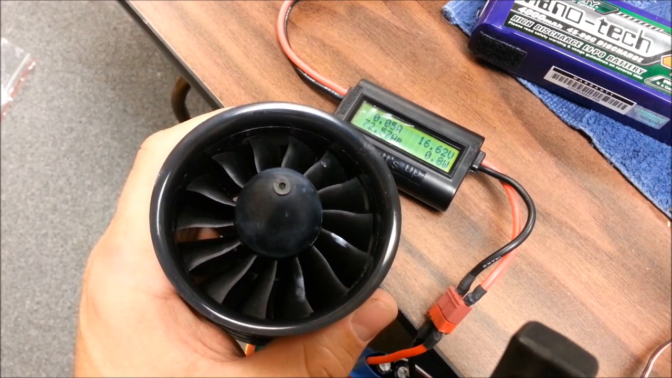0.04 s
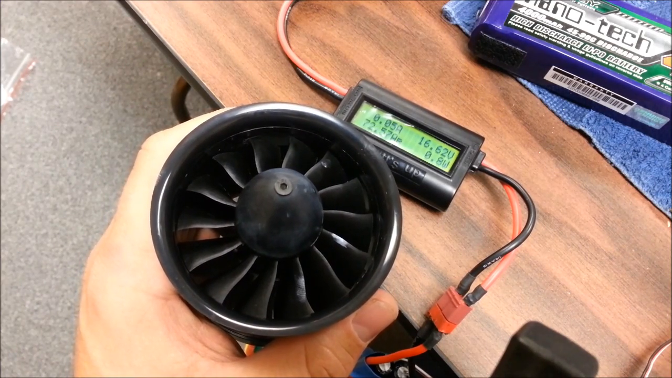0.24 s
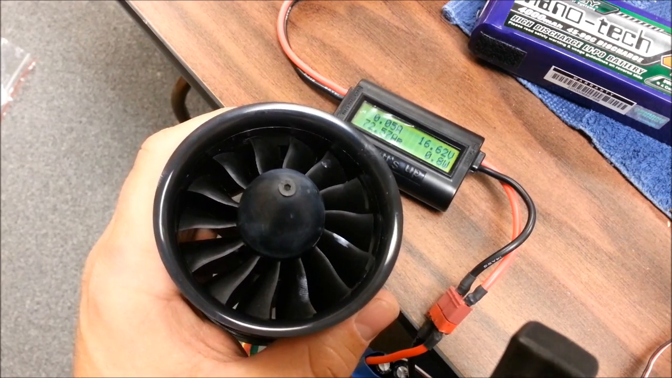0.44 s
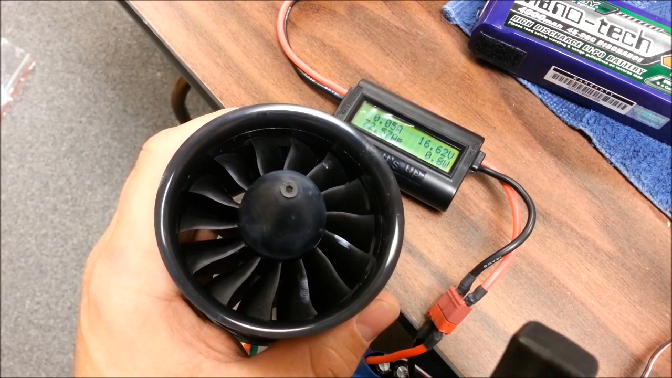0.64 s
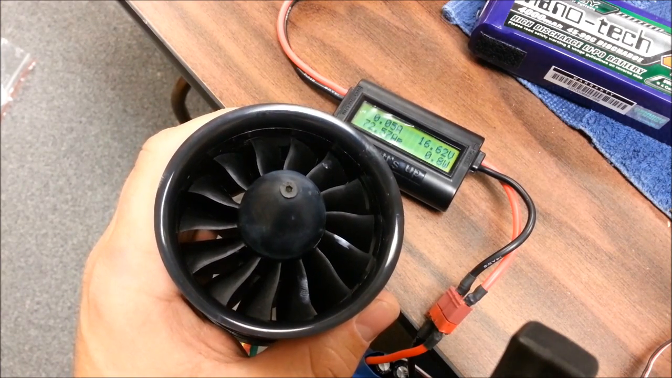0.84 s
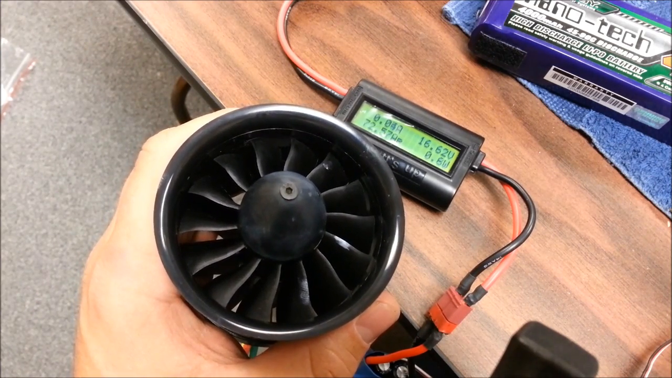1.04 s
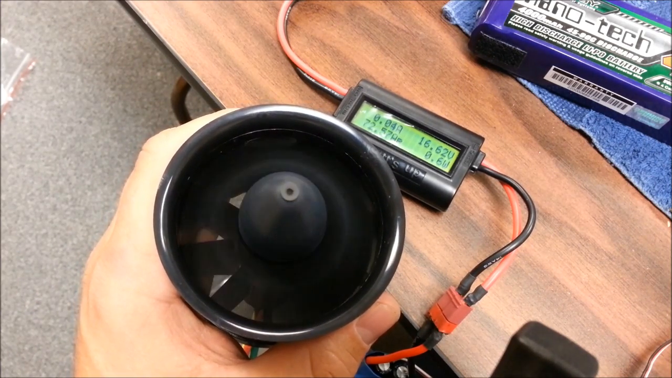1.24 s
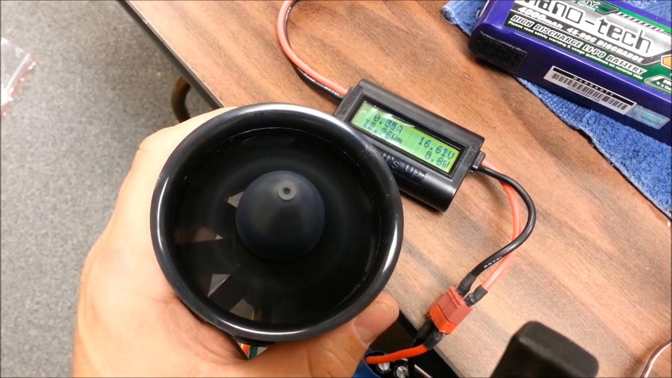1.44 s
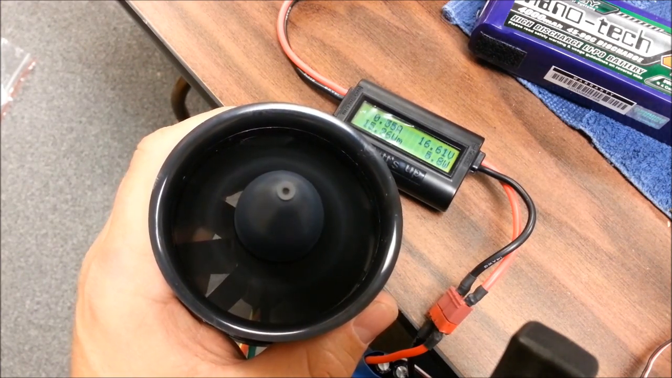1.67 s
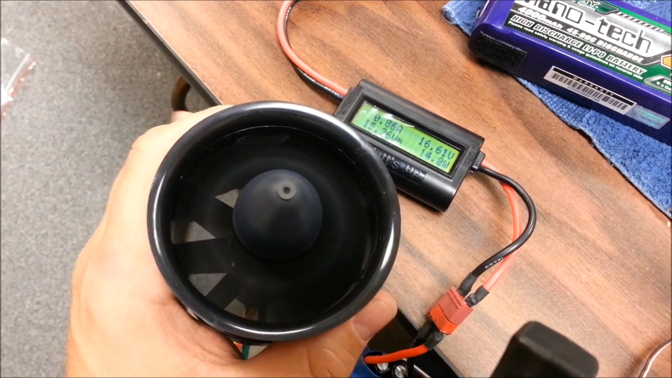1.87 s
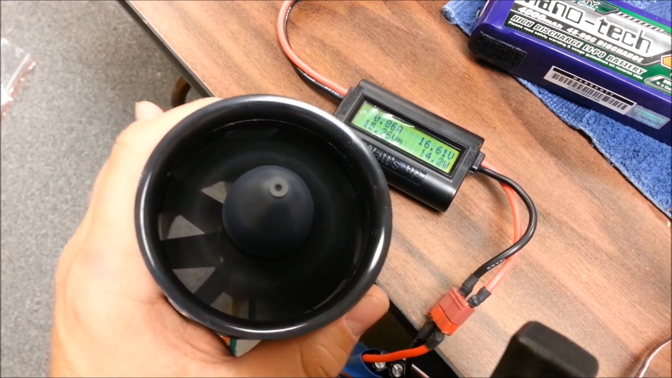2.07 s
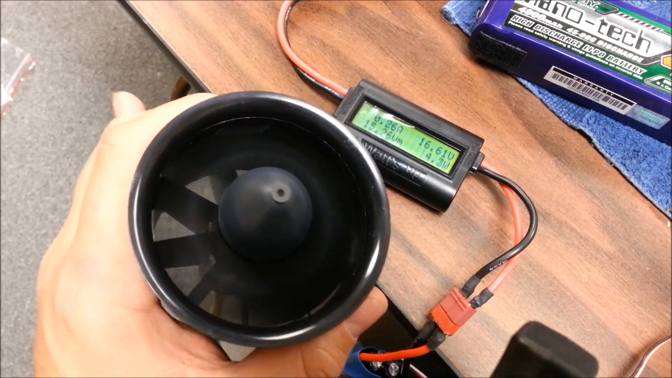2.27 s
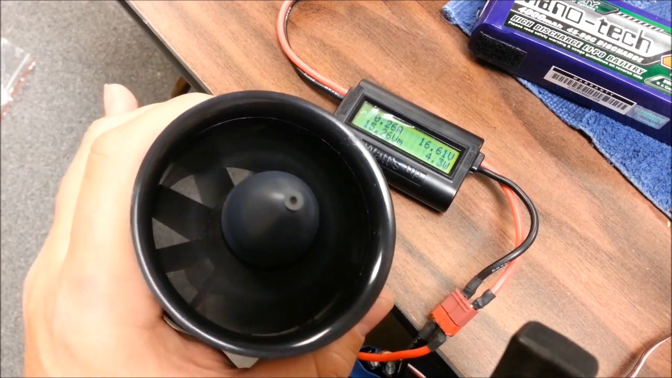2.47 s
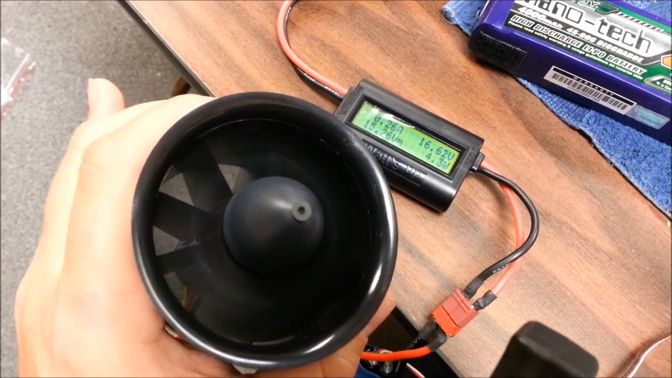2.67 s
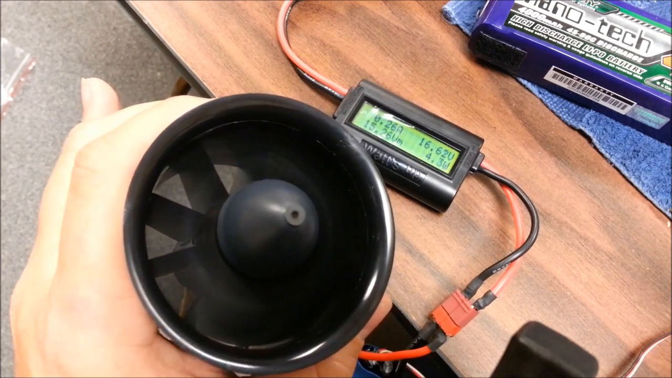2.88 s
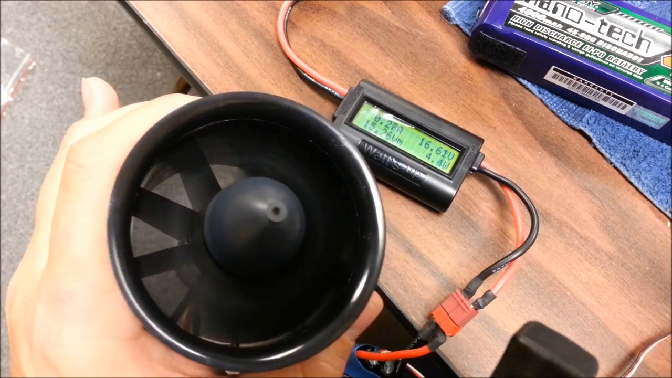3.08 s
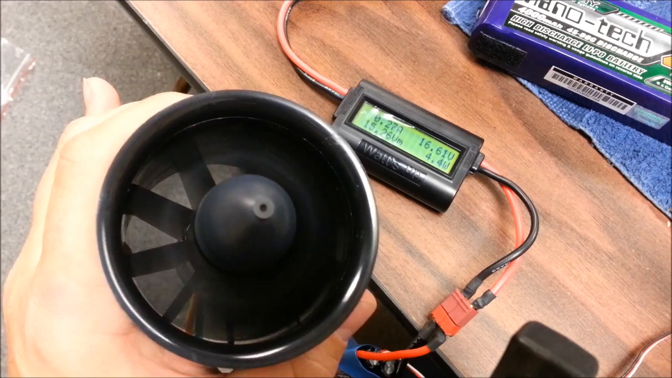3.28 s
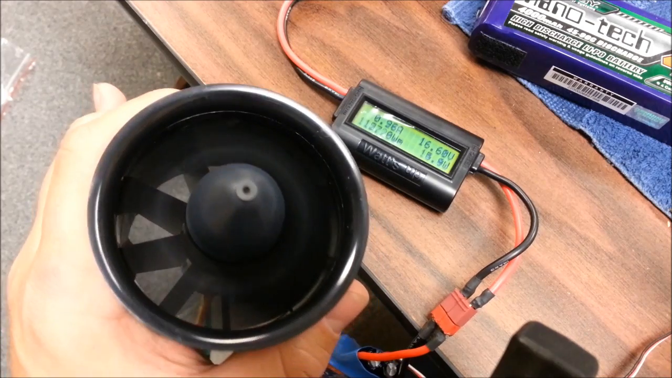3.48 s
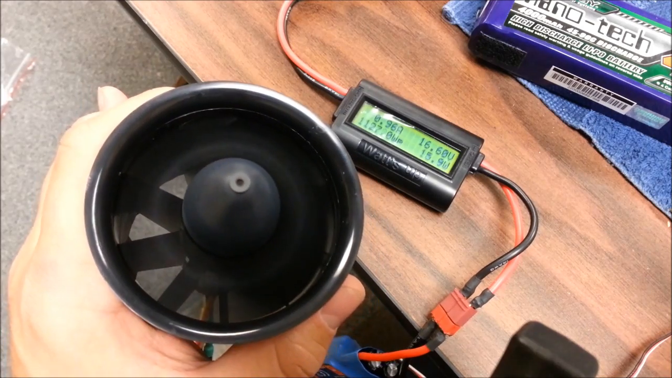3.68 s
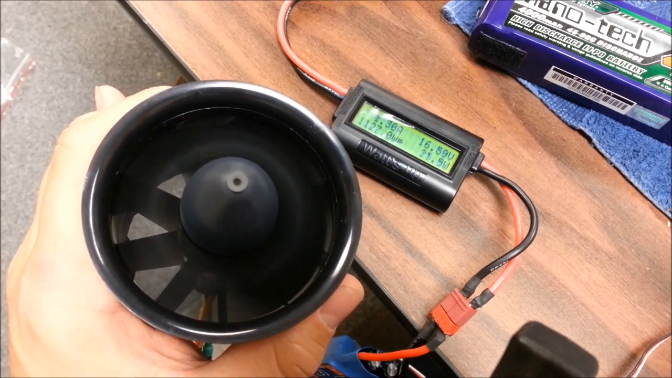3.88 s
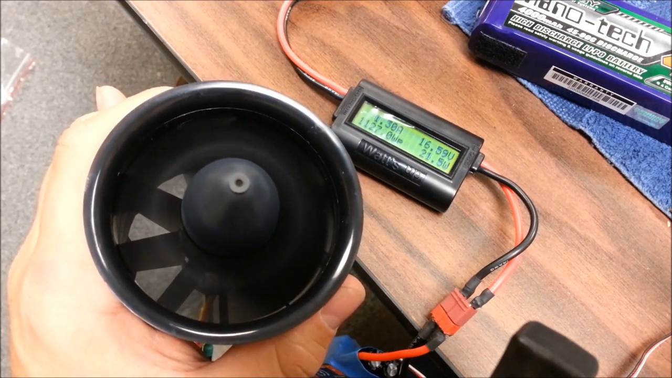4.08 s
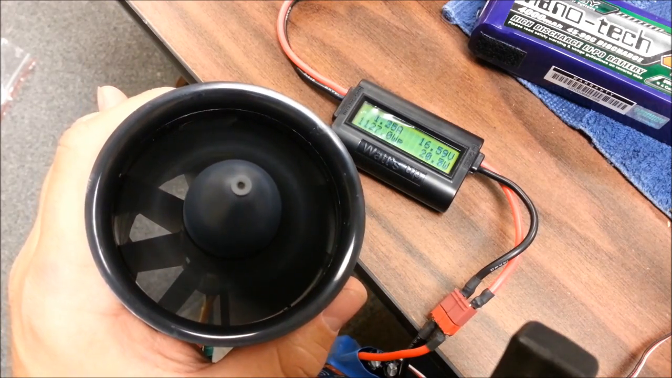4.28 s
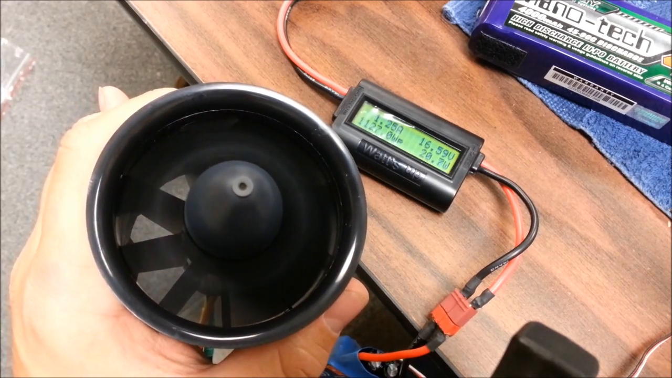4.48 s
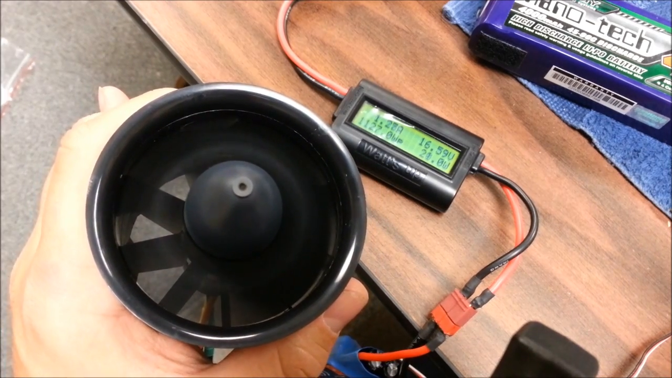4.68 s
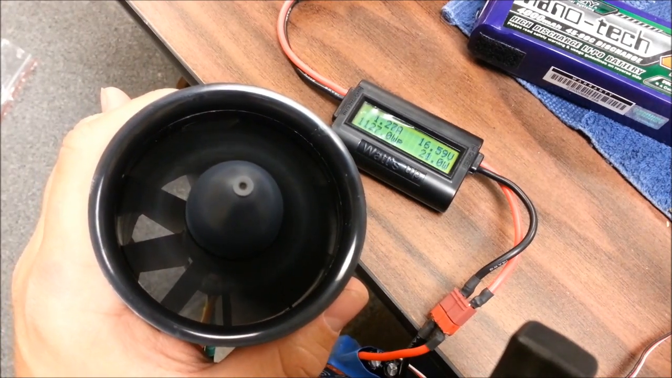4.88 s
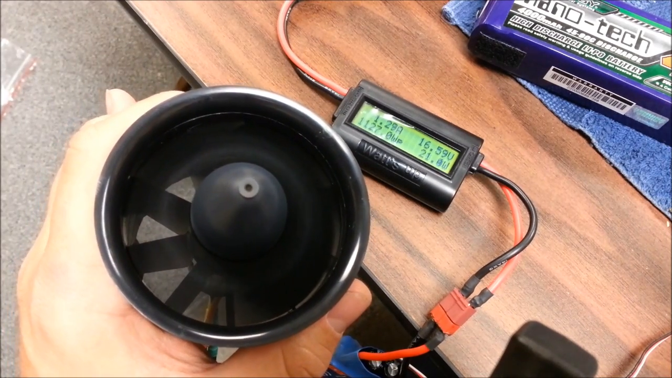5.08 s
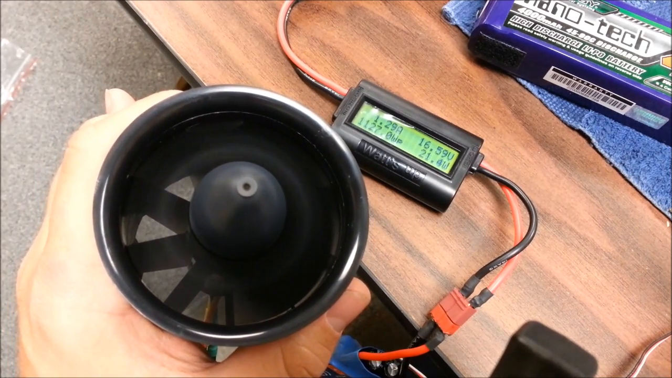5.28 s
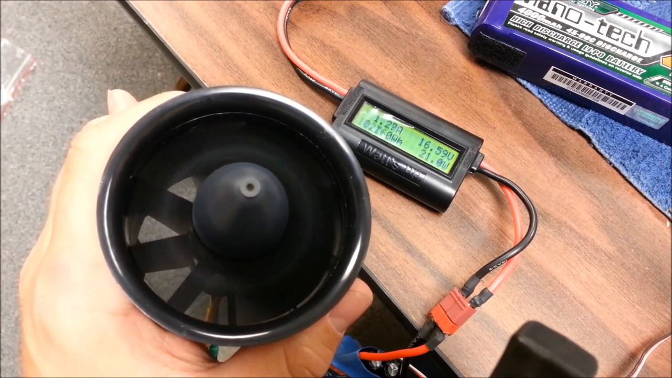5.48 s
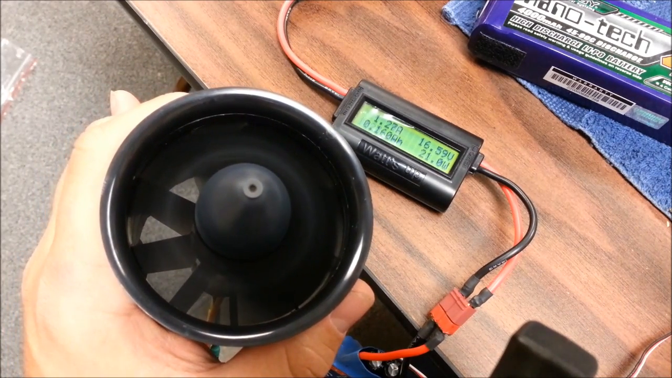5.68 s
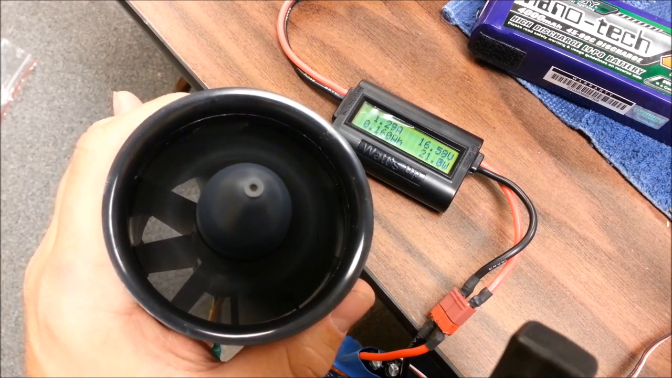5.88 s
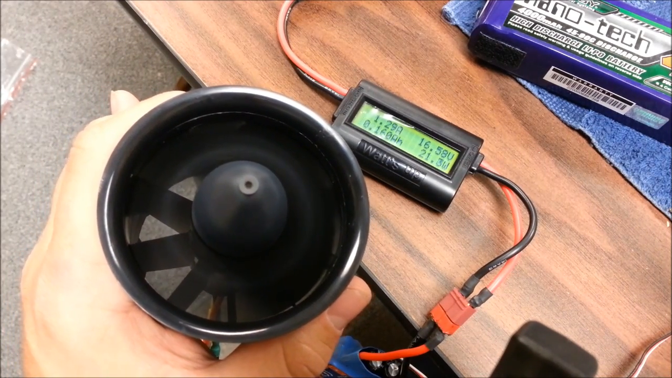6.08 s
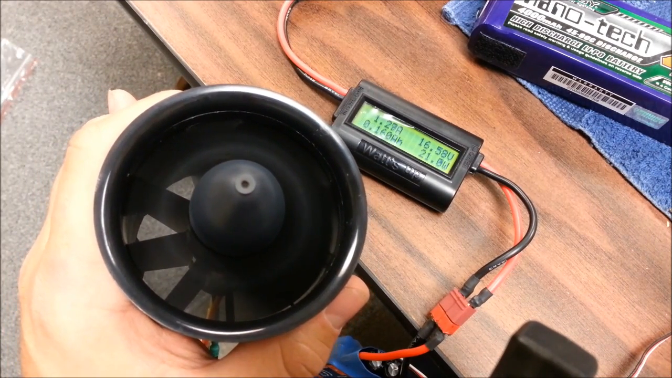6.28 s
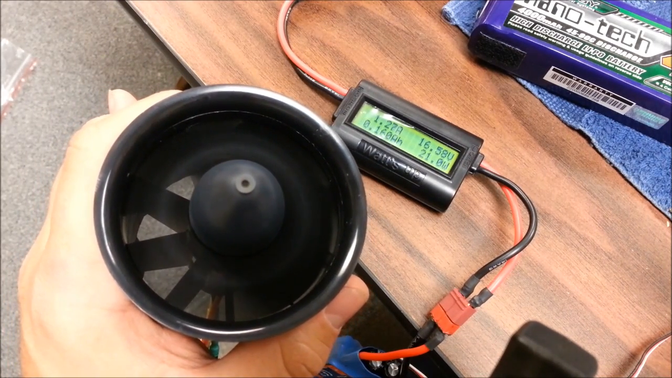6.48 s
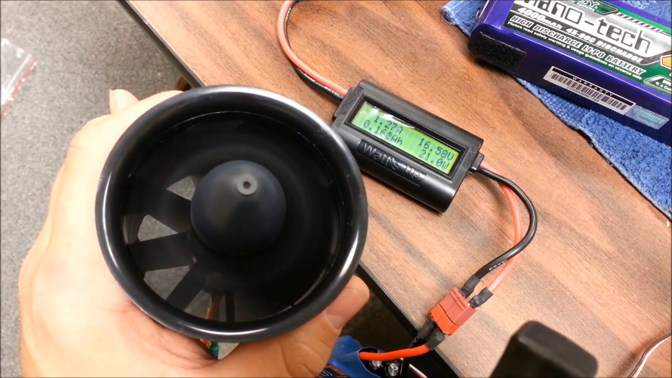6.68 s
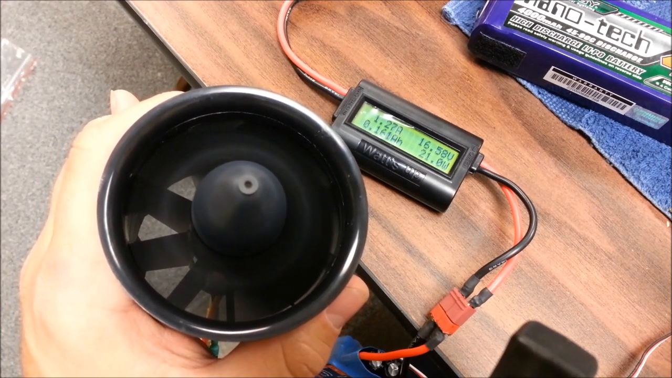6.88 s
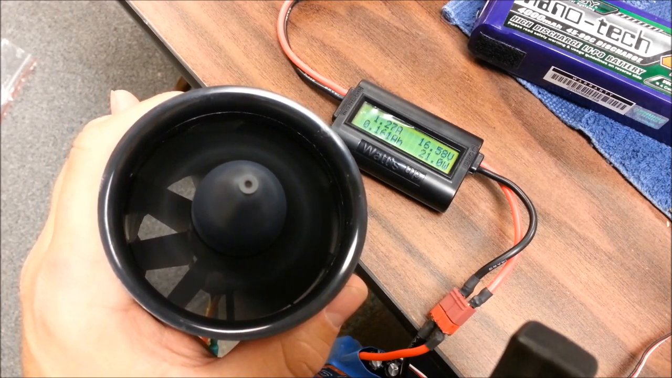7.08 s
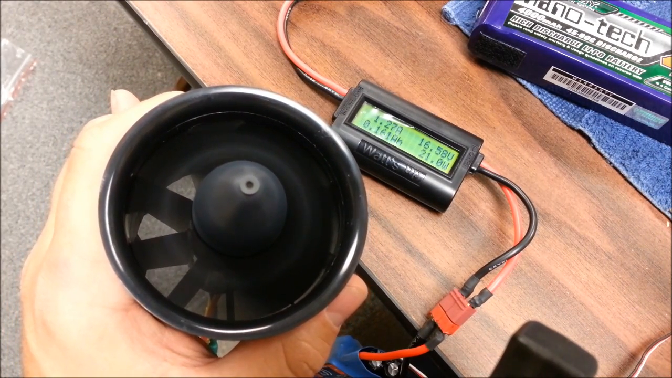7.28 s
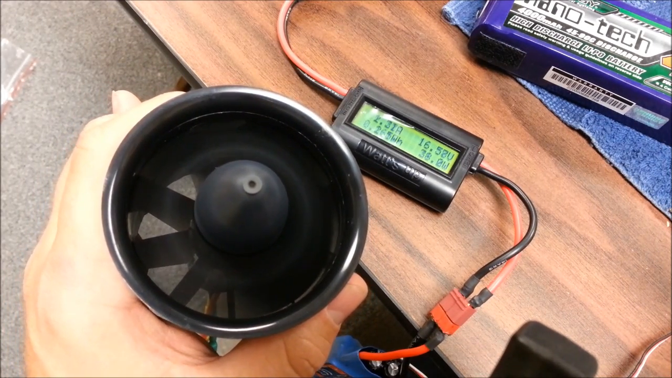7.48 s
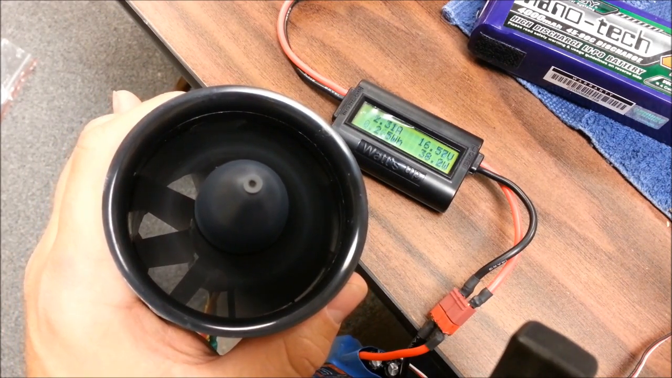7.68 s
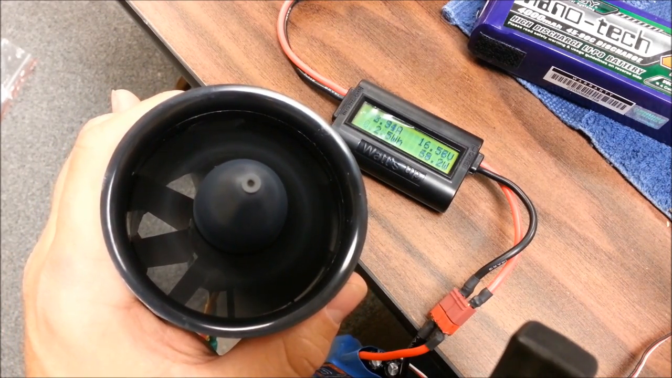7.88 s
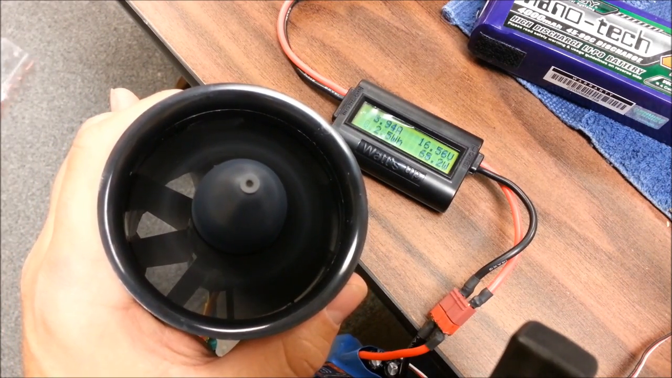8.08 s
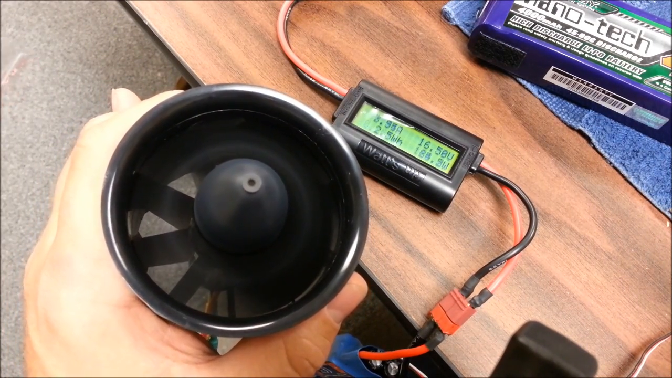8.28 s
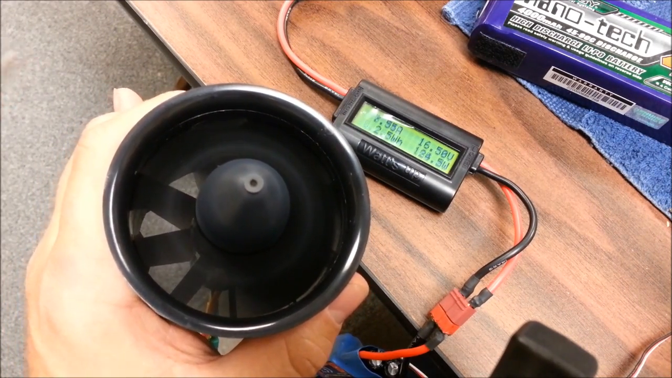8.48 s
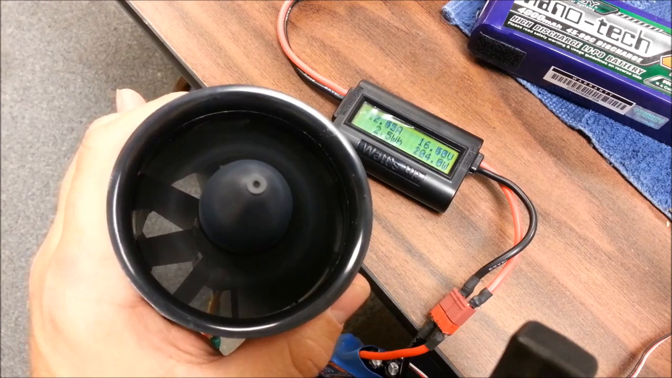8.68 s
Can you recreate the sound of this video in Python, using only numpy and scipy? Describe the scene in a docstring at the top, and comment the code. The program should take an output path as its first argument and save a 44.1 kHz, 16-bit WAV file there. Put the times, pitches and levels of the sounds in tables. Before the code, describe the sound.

Quiet indoor ventilation hush with faint low hum for about a second, then soft ticks and a stuttering jerk as a small hand-held electric ducted fan starts. It flares briefly, settles to an idle whir with rushing air and a thin high controller whistle, rises to a steady middle whine, then climbs in uneven steps to a roaring scream that overloads the close stereo microphone. It ends still rising.

```python
"""In a quiet room with a ventilation hush and hum, a hand-held electric ducted fan runs close to a two-port microphone.
Its 14-blade rotor stutters into motion, idles, holds a middle speed and climbs again. Magnetic pull rings the
motor housing whenever one of its tones sweeps past a mode; blades whine over rushing air, and the speed controller
whistles, mostly at the right port. The fan reaches the left port late, and the microphone overloads."""
import sys
import numpy as np
from scipy import signal
from scipy.io import wavfile
from scipy.ndimage import uniform_filter1d

SR = 44100
rng = np.random.default_rng(int(sys.argv[2]) if len(sys.argv) > 2 else 0)


def volts(x):
    """Linear amplitude factor 10**(x/20) for a level x in dB, scalar or array-like."""
    e = np.asarray(x, float) / 20
    return 10 ** e


def to_wav(s):
    """Save 16-bit WAV."""
    ch = np.atleast_2d(s).T  # columns
    pcm = np.round(np.clip(ch, -1, 1) * 32767)  # PCM
    wavfile.write(sys.argv[1], SR, pcm.astype(np.int16))


N = 385434
T = np.arange(N) / SR  # s
SIZE, HOP = 1024, 256  # spectral frame and step, samples

# Room hush: f/Hz, spectral level/dB per Hz before the whole is set to HUSH_DB
ROOM_COLOUR = [(18, -57), (30, -37), (96, -22), (127, -12), (192, -18), (230, -7), (348, -14), (386, -19.5),
               (525, -14), (598, -19.5), (2470, -23.5), (6090, -36.5), (14300, -35.5)]
# Likeness of the room at the two ports: f/Hz, likeness (-1 to 1)
ROOM_LIKENESS = [(60, -0.27), (180, 0.75), (530, 0.52), (1570, -0.47), (4660, 0.35), (13800, -0.066)]
HUSH_DB, HUM_HZ, HUM_DB = -51.5, 130, -59

# Hand on the throttle: t/s, speed asked for/(turns/s)
THROTTLE = [(1.243, 89.6), (1.428, 118.4), (1.46, 165.2), (1.5, 131.1), (1.501, 52.6), (2.491, 64.3),
            (2.774, 61.7), (3.007, 63.1), (3.095, 117.0), (3.149, 132.9), (5.076, 133.0), (6.962, 132.5),
            (7.004, 145.8), (7.083, 148.8), (7.143, 182.8), (7.348, 180.4), (7.456, 184.5), (7.518, 205.9),
            (7.731, 232.0), (7.837, 238.6), (8.029, 292.5), (8.126, 304.5), (8.262, 305.0), (8.362, 329.8),
            (8.515, 343.2), (8.554, 346.4), (8.742, 380.6)]
START_S, SWITCH_S = 1.22, 1.435  # the rotor catches; the controller starts switching
FIRST_SPEED, CRUISE = 44.0, 133  # speed at the first turn and middle speed, turns/s
# The drive falters as the start-up ends: centre/s, spread/s, change of the tones/dB
ROUGH_S, ROUGH_WIDTH_S, ROUGH_TONE_DB = 1.505, .035, -10
# Hand shifting on the duct: t/s, housing tones level/dB, blade tone level/dB, twice the blade tone level/dB
GRIP = [(1.55, 0, 0, 2), (1.9, 0, 4, 3), (2.1, 0, 4, -6), (2.35, 0, 2, -8), (2.65, -5, 0, -2),
        (2.75, 3, -4, 0), (3.02, 2, -4, 0), (3.14, 0, -8, -16), (3.26, -2, -6, 2), (3.4, 0, 0, 3),
        (3.7, 0, 0, 0)]

# Controller whistle before load is counted: shaft/(turns/s), left level/dB, right level/dB
WHISTLE_LEVELS = [(62, -44.5, -30.5), (133, -41, -26.5), (171, -35, -26), (215, -37, -24.5),
                  (280, -47, -26.5), (353, -54, -29)]

# Rush colour, relative: f/Hz, idle level/dB, middle-speed level/dB, top-speed level/dB
AIR_COLOUR = [(110, -20, -26.5, -36), (200, -8, -24.5, -22), (340, -2.5, -16.5, -19.5),
              (480, -0.5, -21, -18.5), (816, 1, -11, -14), (1150, -2, -9, -12), (2010, -1, -5.5, -5.5),
              (2530, 5, 0.7, -1), (2840, -2.5, -6.5, -7), (3456, 6.5, 4, 3), (3880, -6, -8, -3),
              (3840, 0, 4, 3), (4760, -8, -3.5, -2.5), (5740, -16, -9, -9.5), (8330, -16, -11.5, -9.5),
              (9600, -27, -13, -11), (10650, -20.5, -13.5, -8), (14200, -50, -16, -12.5)]
COLOUR_SPEEDS = 65.2, 151.4, 260  # turns/s of the three colours
# Sudden jumps of the rush: t/s, level/dB, settling/s
SURGES = [(1.455, 5, .08), (3.14, 3, .15), (7.055, 4, .1)]
# The two microphone ports in the rush: f/Hz, left minus right level/dB, likeness
PORTS = [(200, 8.5, 0.14), (320, -0.5, 0.43), (470, -1, 0.25), (755, -2.2, 0.72), (1070, -3.5, 0.71),
         (1560, 5.5, 0.97), (2400, -2.5, 0.06), (3060, 0.5, 0.075), (3430, 2, 0.46), (4100, 0.5, 0.087),
         (4630, 2, 0.34), (5500, -1.5, 0.2), (6700, -3, 0.067), (9000, -8.5, 0.13), (11000, -4.5, 0.14),
         (14300, -9.5, 0.182)]
LAG = 7.36  # samples by which the fan reaches the left port late

BLADES = 14
# What the duct lets out of the blade tone, against the rush: f/Hz, level/dB
DUCT = [(800, -22), (1000, -11.5), (1190, -19), (1400, -15), (1750, -23), (1860, -13), (2070, -22),
        (2300, -9), (2750, -7), (3150, -17), (3500, -10), (3900, -11.5), (4150, -3.5), (4380, -9.5),
        (4620, -4), (4900, -17)]
# The same for twice the blade tone: f/Hz, level/dB
DUCT_TWICE = [(1500, -18), (1750, -11), (1950, -25), (2180, -3), (2500, -8.5), (3000, -9.5), (3400, -10),
              (3720, -9.5), (4100, -5.5), (4650, -13), (4950, -5), (5900, -11), (6400, -7), (7800, -10.5),
              (8800, -7.5), (9800, -8.5)]
# Uneven blades and struts, before the rush sets their strength:
# multiple of shaft speed, left level/dB, right level/dB
UNEVEN = [(7, -62.1, -52.6), (9, -52.9, -52.8), (10, -50.3, -52.9), (11, -56.7, -55.0), (15, -51.5, -46.3),
          (16, -48.4, -46.6), (17, -46.5, -44.3), (18, -46.6, -45.2), (19, -43.6, -48.2),
          (20, -51.0, -49.6), (21, -54.1, -48.7), (23, -53.6, -55.2), (25, -42.5, -52.0),
          (26, -44.2, -49.3), (27, -46.0, -45.9), (29, -45.9, -45.2), (30, -41.1, -46.9),
          (32, -54.6, -51.2), (34, -48.7, -54.6), (36, -54.6, -52.0), (37, -51.6, -58.2),
          (42, -53.9, -51.0), (45, -59.6, -56.2), (56, -61.7, -53.6)]
GROWING = 10, 16  # the two multiples that swell as the fan climbs

# Magnetic pull at 6, 12 and 24 times the shaft speed, before push, faltering and grip:
# shaft/(turns/s), 6x level/dB, 12x level/dB, 24x level/dB
PULL = [(45, -38, -40, -43), (62.6, -22, -13, -7.5), (62.4, -29, -4.5, -15), (70.3, -17, -5.5, -3.5),
        (85, -15, 4, 2.5), (96, -12, 2, -1), (120, -12, -1.5, 6), (133.7, -18, -1.5, 4),
        (140, -4, 6.5, 2.5), (157, -17, 11.5, 2), (165, -9, 10.5, -5), (190, -12, 6, -6), (252, -7, 16, -4),
        (282, -8, 3.5, -5), (315, -2.5, 7, -4), (340, -5, 7, -4)]
POLE_ORDERS = 6, 12, 24
# Housing modes: f/Hz, width/Hz, left level/dB, right level/dB, left lag/samples
HOUSING = [(1598, 186, -25.5, -45, 2.4), (2016, 16.3, -7, 0, 8.3), (2046, 25, -23, -11, 9.1),
           (2750, 290, -37, -37, 6.7), (3336, 59, -18.5, -14.5, 5.62)]
# First jerks of the rotor: t/s, relative level/dB
KICKS = [(1.1777, -35), (1.1937, -30), (1.2284, -54), (1.2404, -28), (1.2574, -28), (1.2825, -25.5),
         (1.3044, -33)]


def evened(x):
    """Scales to rms 1."""
    return x / np.sqrt(np.mean(abs(x) ** 2) + 1e-20)


def curves(rows, t=T):
    """Joins table rows by straight lines."""
    s, *columns = np.transpose(rows)
    return [np.interp(t, s, c) for c in columns]


def read(rows, hz):
    """Reads spectra on a log-frequency axis."""
    return curves([(np.log(f), *v) for f, *v in rows], np.log(hz + 1))


def wander(hz):
    """Slow complex chance of rms 1 that changes about hz times a second."""
    s = np.arange(0, T[-1] + .1, .002)
    r = np.exp(-2 * np.pi * hz * s[1])
    z = rng.standard_normal((len(s), 2)) @ [1, 1j]
    for _ in range(2):
        z = signal.lfilter([1], [1, -r], z)
    z = evened(z)
    return np.interp(T, s, z.real) + 1j * np.interp(T, s, z.imag)


def resonate(x, hz, width):
    """One mode, gain 1 at its centre."""
    r = np.exp(-np.pi * width / SR)
    return 2 * signal.lfilter([1 - r], [1, -r * np.exp(2j * np.pi * hz / SR)], x).real


def noise(field_db, same, lag):
    """Two partly alike noises, coloured by field_db(hz, frame times), the left one late by lag samples."""
    white = rng.standard_normal((2, N))
    hz, s, (a, b) = signal.stft(white, SR, nperseg=SIZE, noverlap=SIZE - HOP)
    same = np.clip(same(hz), -1, 1)[:, None]
    late = np.exp(-2j * np.pi * hz * lag / SR)[:, None]
    left = (same * a + np.sqrt(1 - same ** 2) * b) * late
    coloured = np.array([left, a]) * volts(field_db(hz, s))
    return signal.istft(coloured, SR, nperseg=SIZE, noverlap=SIZE - HOP)[1][:, :N]


def drive(t=T):
    """Shaft speed lagging behind the throttle, and how hard it gains or loses speed (100 turns/s2)."""
    spin_up_s, coast_s = .179, .463  # lag under power; run-down time
    coast_to = 56.9  # turns/s that a run-down heads for
    step = .002  # s
    s = np.arange(THROTTLE[0][0], T[-1] + step, step)
    speed, gain = [FIRST_SPEED], []
    for asked in curves(THROTTLE, s)[0]:
        gain.append(max((asked - speed[-1]) / spin_up_s, (coast_to - speed[-1]) / coast_s))
        speed.append(speed[-1] + step * gain[-1])
    gain = np.interp(t, s, gain) / 100
    push = np.maximum(gain, 0) * (t > SWITCH_S)
    coast = np.maximum(-gain, 0)
    return np.interp(t, s, speed[:-1]), push, coast


def flow_db():
    """The rush grows with speed and with the blades' bite while the fan gains speed, up to a ceiling."""
    cruise_db, db_per_octave, ceiling_db = -19, 14, -7
    push_db, lag_s = 2, 0.043  # push_db is per 100 turns/s2
    surge_rise_s = .012
    speed, push, _ = drive()
    keep = np.exp(-1 / (lag_s * SR))
    bite = signal.lfilter([1 - keep], [1, -keep], push)
    jumps_db = 0
    for s, db, settle_s in SURGES:
        rise = np.clip((T - s) / surge_rise_s, 0, 1)
        jumps_db = jumps_db + db * rise * np.exp(-np.maximum(T - s, 0) / settle_s)
    level_db = cruise_db + db_per_octave * np.log2(speed / CRUISE) + push_db * bite + jumps_db
    return np.minimum(level_db, ceiling_db)


def falter():
    """A short spell, 0 to 1, in which the motor runs rough."""
    return np.exp(-((T - ROUGH_S) / ROUGH_WIDTH_S) ** 2)


def room():
    """Ventilation hush, as coloured noise, with a hum whose strength wavers."""
    hush = evened(noise(lambda hz, s: read(ROOM_COLOUR, hz)[0][:, None],
                        lambda hz: read(ROOM_LIKENESS, hz)[0], 0))
    hum = (np.exp(2j * np.pi * HUM_HZ * T) * (1 + 0.45 * wander(1.3))).real
    return volts(HUSH_DB) * hush + volts(HUM_DB) * hum


def whistle():
    """Controller switching: a nearly pure tone, mostly at the right port, that follows the motor current."""
    rest_hz, sag_hz = 7810, .25  # pitch at rest; Hz lost per turn a second
    push_db, coast_db = 4.5, -13.5  # per 100 turns/s2 gained or lost
    surge_s, surge_width_s, surge_db = 1.463, .016, 22  # a surge of current just after switching starts
    speed, push, coast = drive()
    left_db, right_db = curves(WHISTLE_LEVELS, speed)
    surge = np.exp(-((T - surge_s) / surge_width_s) ** 4)
    # until the rough spell's centre the load stays low, apart from the surge
    load_db = np.where(T > ROUGH_S, push_db * push + coast_db * coast, coast_db)
    load = volts(load_db + surge_db * surge)
    onset = np.clip((T - SWITCH_S) / .03, 0, 1) ** 2
    hz = rest_hz - sag_hz * speed
    tone = np.exp(2j * np.pi * np.cumsum(hz) / SR) * (1 + 0.053 * wander(26)) * load * onset
    return np.array([volts(left_db) * (tone * np.exp(-.4j)).real, volts(right_db) * tone.real])


def rush():
    """Turbulent air: noise whose colour shifts with shaft speed, in faint drifting patches."""
    def field_db(hz, s):
        """Level over frequency and time at each port."""
        speed = drive(s)[0]
        place = np.interp(np.log(speed), np.log(COLOUR_SPEEDS), range(3))  # 0 idle, 1 middle, 2 top
        idle, middle, top = (c[:, None] for c in read(AIR_COLOUR, hz))
        colour = middle + (idle - middle) * np.maximum(1 - place, 0)
        colour = colour + (top - middle) * np.maximum(place - 1, 0)
        # a rumble rides on the shaft speed
        near_shaft = np.log((hz[:, None] + 1) / (0.86 * speed)) / 0.66
        colour += 11 * np.clip(3 * (place - 1), 0, 1) * np.exp(-near_shaft ** 2)
        patches = rng.standard_normal(colour.shape)
        patches = evened(uniform_filter1d(uniform_filter1d(patches, 10, 0), 12, 1))
        # the draught buffets the ports
        lumpy_db = 0.98 + 2.0 * np.maximum(place - .6, 0) / (1 + (hz[:, None] / 600) ** 3)
        lean = read(PORTS, hz)[0][:, None] / 2
        return colour + np.interp(s, T, flow_db()) + lumpy_db * patches + np.array([lean, -lean])

    fade_in = np.clip((T - 1.15) / 0.1, 0, 1)
    return noise(field_db, lambda hz: read(PORTS, hz)[1], LAG) * fade_in


def blades(turns):
    """Blade tones waver with the turbulence drawn in; small unevenness adds weak tones between them."""
    air_db, speed = flow_db(), drive()[0]
    late = np.interp(T - LAG / SR, T, turns)
    grip_db = curves(GRIP)
    out = np.zeros((2, N))
    # multiple of the blade tone, duct, shared waver, half the left-right difference/dB, left phase lead/rad
    for k, duct, waver, left_db, lead in ((1, DUCT, .4, -1.5, -.6), (2, DUCT_TWICE, .2, -2.5, 4.5)):
        order = k * BLADES
        db = air_db + ROUGH_TONE_DB * falter() + grip_db[k] + read(duct, order * speed)[0]
        shared = 0.74 + waver * wander(9.9)
        left = np.exp(2j * np.pi * order * late + 1j * lead) * (shared + 0.24 * wander(12.0))
        right = np.exp(2j * np.pi * order * turns) * (shared + 0.19 * wander(2.5))
        out += [(volts(db + left_db) * left).real, (volts(db - left_db) * right).real]
    gusts = [0.9 + .5 * wander(7.2) for _ in range(4)]
    strength_db = np.minimum(air_db + 20.5, 7)  # at high speed the rush drowns them
    climb_db = 13 * np.clip((speed - 170) / 60, 0, 1)
    for row, (k, *ports_db) in enumerate(UNEVEN):
        in_reach = np.clip((3900 - k * speed) / 400, 0, 1)  # the swell fades above the duct's best range
        level_db = strength_db + climb_db * in_reach * (k in GROWING)
        for port, db in enumerate(ports_db):
            turn = np.exp(2j * np.pi * (k * turns + rng.random()))
            out[port] += volts(db + level_db) * (turn * gusts[(row + port) % len(gusts)]).real
    return out * (T > START_S)


def housing(force):
    """The force rings each mode; each port hears the mode at its own level."""
    out = np.zeros((2, N))
    for hz, width, left_db, right_db, lag in HOUSING:
        ring = resonate(force, hz, width)
        out += [volts(left_db) * np.interp(T - lag / SR, T, ring), volts(right_db) * ring]
    return out


def motor(turns):
    """Magnetic pull at multiples of the shaft speed, first jerks, and bearing rattle shake the housing."""
    push_db = 0.23  # per 100 turns/s2
    speed, push, _ = drive()
    shared_db = push_db * push + ROUGH_TONE_DB * falter() + curves(GRIP)[0]
    force = np.zeros(N)
    for k, db in zip(POLE_ORDERS, curves(PULL, speed)):
        phase = 2 * np.pi * (k * turns + rng.random()) + 0.18 * wander(26).real
        force += volts(db + shared_db) * np.cos(phase)
    force *= T > START_S
    jerk = signal.windows.hann(15) / 5  # a soft-edged push
    for s, db in KICKS:
        force[round(s * SR):][:len(jerk)] += volts(db + 53.5) * rng.choice([-1, 1]) * jerk
    # the rotor hunts for its place
    stutter = np.exp(-((T - 1.26) / 0.066) ** 2) * volts(-6.0) * abs(wander(49))
    rattle = volts(0.17 * flow_db() - 10)
    force += (stutter + rattle) * (T > KICKS[0][0]) * rng.standard_normal(N)
    return housing(force)


def scene():
    """Room and fan together at the two ports."""
    turns = np.cumsum(drive()[0]) / SR
    return room() + whistle() + rush() + blades(turns) + motor(turns)


def low_pass(x):
    """Removes everything above the highest recorded frequency."""
    return signal.sosfilt(signal.butter(12, 14420, fs=SR, output="sos"), x)


def record(dry):
    """A wind filter raises its corner as the hiss grows; a limiter ducks long overloads, too late to stop clipping."""
    hz, s, z = signal.stft(dry, SR, nperseg=4 * SIZE)
    hiss = (abs(z[:, hz > 8500]) ** 2).sum(1).mean(0)
    hiss_db = 10 * np.log10(signal.lfilter([.12], [1, -.88], hiss) + 1e-12)
    corner_hz = 12 + 55 * volts(0.32 * (hiss_db + 49.0)) + 70 / (1 + volts(-3 * (hiss_db + 29)))
    low_cut = np.sqrt(1 + (corner_hz / (hz[:, None] + 1)) ** 7)
    filtered = signal.istft(z / low_cut, SR, nperseg=4 * SIZE)[1][:, :N]
    power_db = 10 * np.log10(abs(uniform_filter1d((filtered ** 2).max(0), 600)) + 1e-12)
    fall = T * 70  # recovers 70 dB a second
    held_db = np.maximum.accumulate(power_db + fall) - fall
    over_db = np.maximum(held_db + 1.0, 0)  # threshold -1 dB
    keep = np.exp(-1 / (0.0095 * SR))  # takes hold in about 30 ms
    ducked = filtered / volts(signal.lfilter([1 - keep], [1, -keep], over_db))
    return low_pass(np.clip(ducked, -1, 1))


dry = scene()
out = record(dry)
to_wav(out)
```